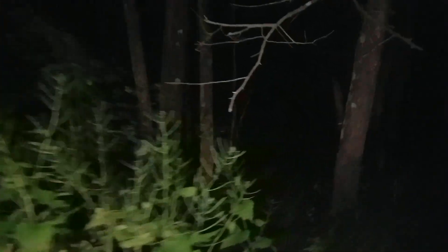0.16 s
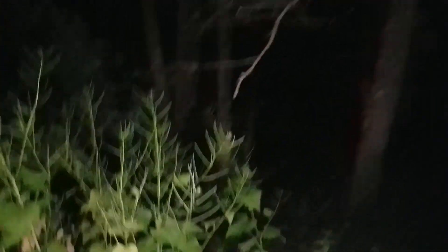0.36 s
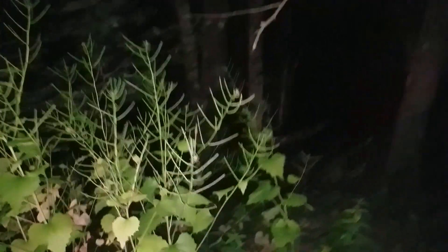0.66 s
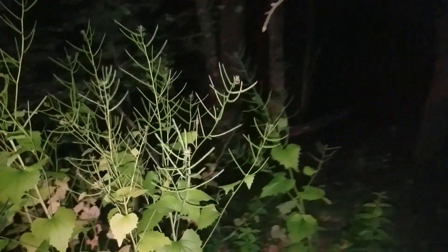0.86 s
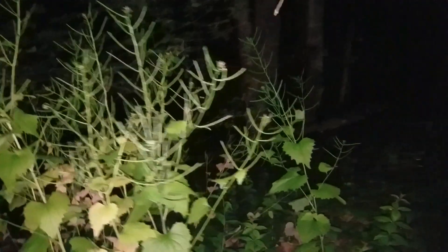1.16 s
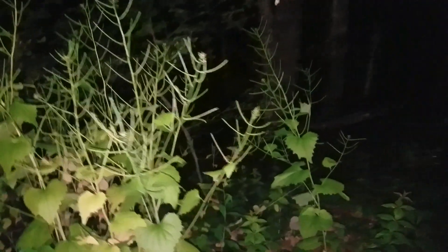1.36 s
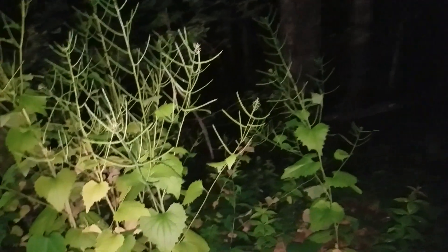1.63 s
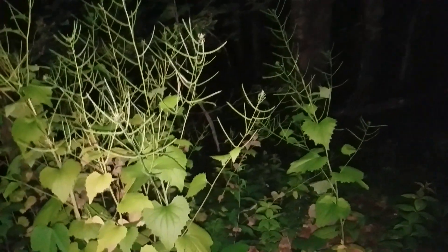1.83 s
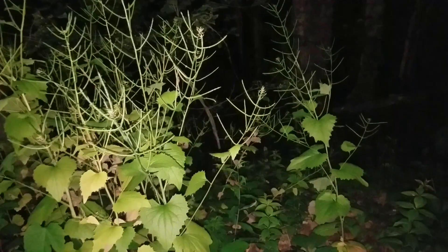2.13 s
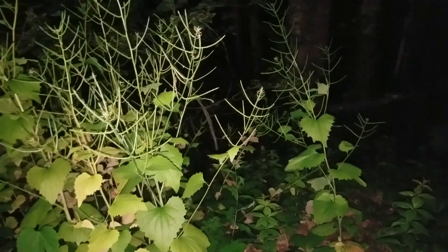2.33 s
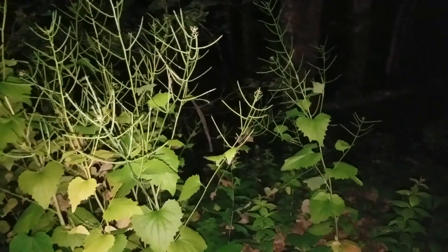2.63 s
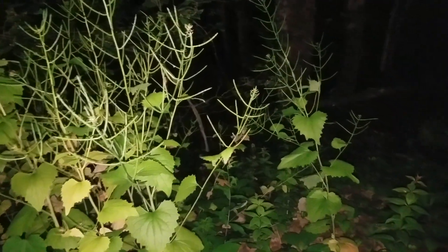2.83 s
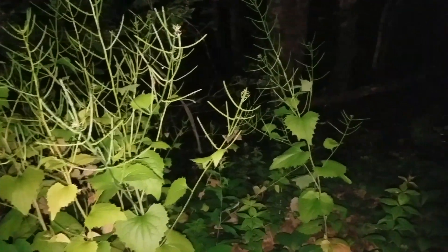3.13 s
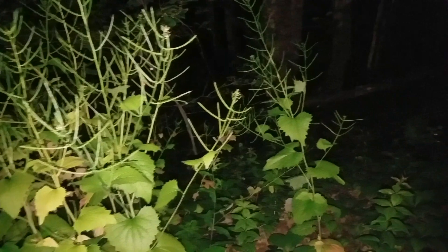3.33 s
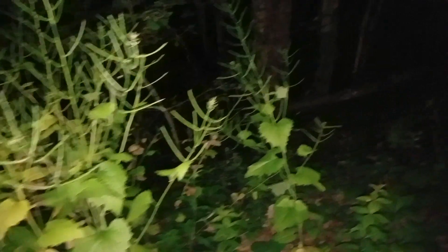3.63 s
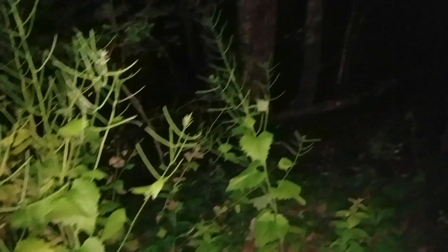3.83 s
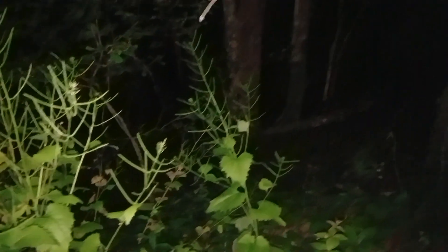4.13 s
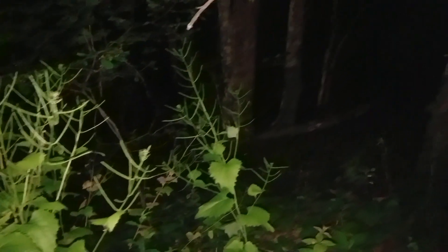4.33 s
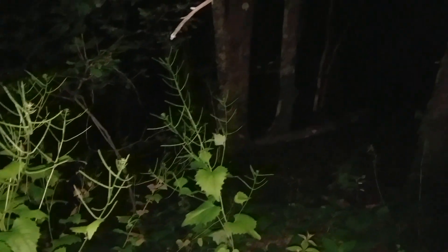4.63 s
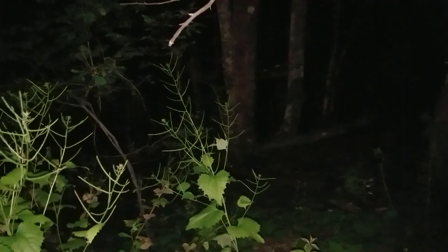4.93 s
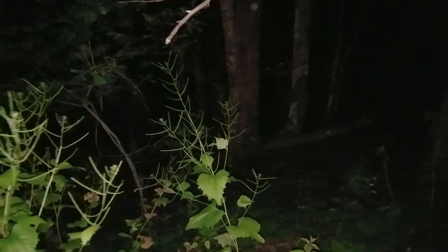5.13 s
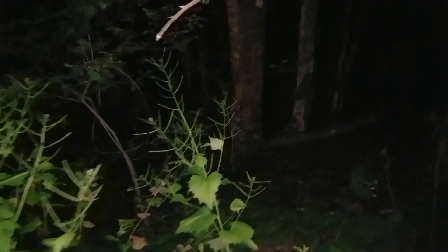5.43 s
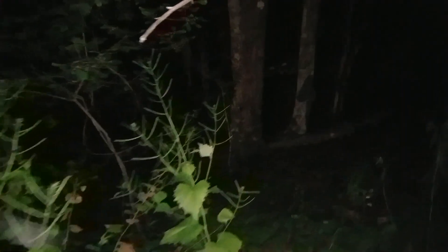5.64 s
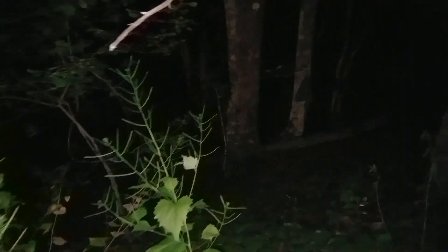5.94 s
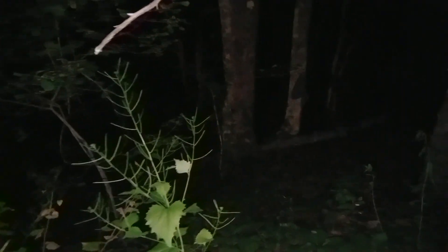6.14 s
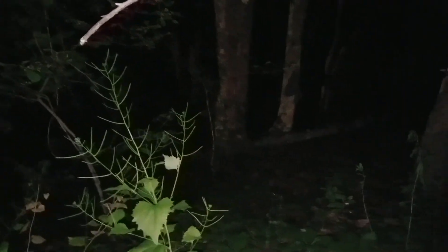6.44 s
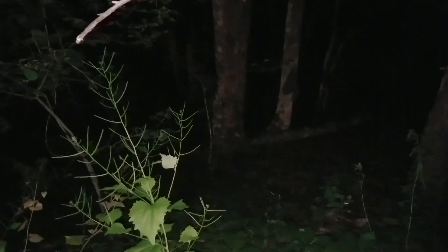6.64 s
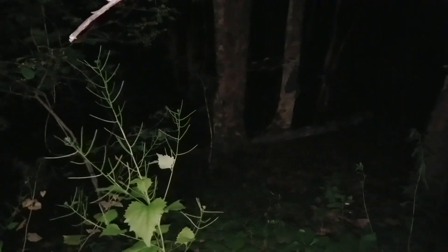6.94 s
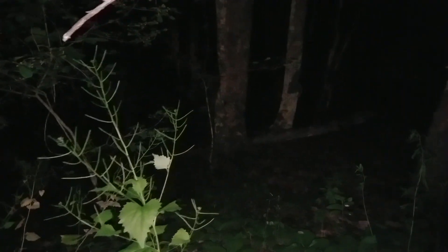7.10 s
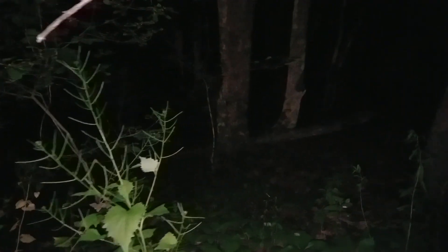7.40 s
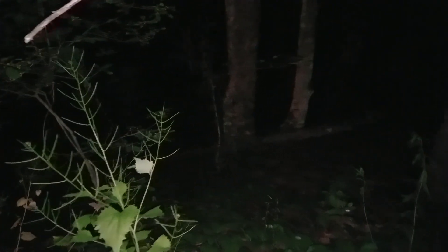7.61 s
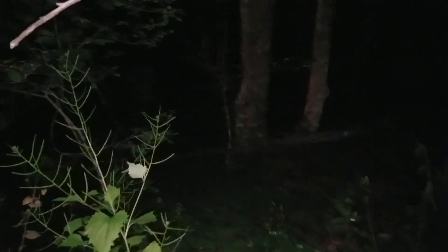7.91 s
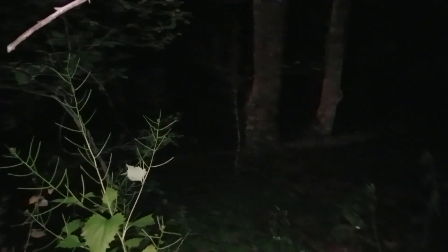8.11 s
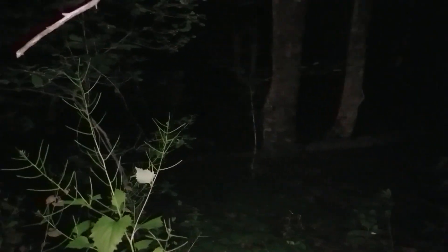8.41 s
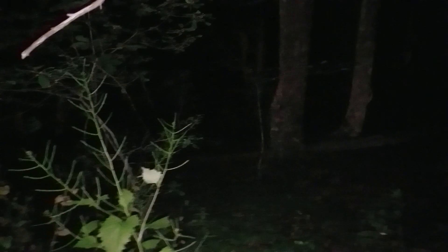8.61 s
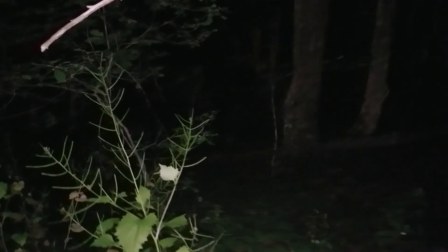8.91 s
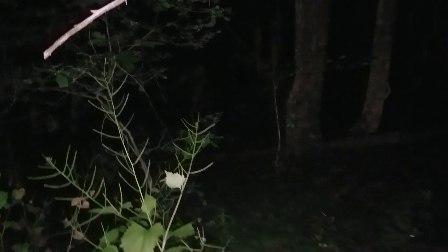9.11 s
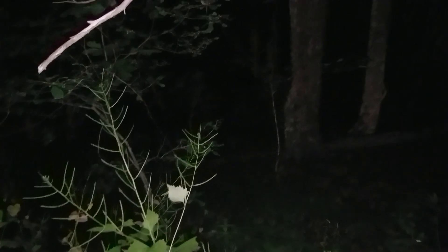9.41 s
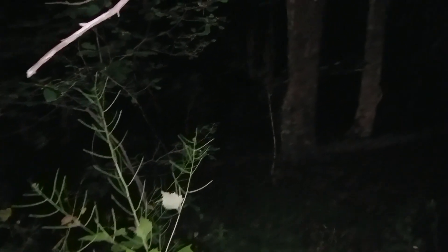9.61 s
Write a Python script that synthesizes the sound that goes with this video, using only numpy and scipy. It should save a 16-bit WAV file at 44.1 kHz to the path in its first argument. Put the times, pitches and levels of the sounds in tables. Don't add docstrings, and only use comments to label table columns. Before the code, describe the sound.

A handheld phone hears frogs from near and far, strongest on the right, their rapid purring trills softened by echo among trees. First come light stem ticks and leafy rustles, later a dull thump on the left and a hard dry snap. Behind, a distant vehicle fades, then swells with rumble, tyre roar and a sinking hollow murmur, alongside soft hum, hiss and a barely audible insect.

```python
import sys
import numpy as np
from scipy import signal
from scipy.fft import rfft, irfft
from scipy.io import wavfile
from scipy.ndimage import uniform_filter1d

SR = 44100
rng = np.random.default_rng(int(sys.argv[2]) if len(sys.argv) > 2 else 0)


def wav_record(signal):
    frames = np.transpose(np.atleast_2d(signal))
    bounded = np.clip(frames, -1, 1)
    quanta = np.round(bounded * 32767).astype(np.int16)
    wavfile.write(sys.argv[1], SR, quanta)


def volts_from_decibels(level):
    exponent = np.asarray(level, float) / 20
    return 10 ** exponent


N = 430416

# first_pulse_s, last_pulse_s, pulse_count, second_partial_hz, level_db
RIGHT_BIG = [
    (1.442, 1.821, 10, 1919, -13),
    (8.825, 9.247, 11, 1880, -15.5),
]
RIGHT_SMALL = [
    (0.023, 0.463, 10, 2143, -24.5),
    (0.499, 1.012, 13, 2372, -26.5),
    (0.819, 1.304, 12, 1887, -19.5),
    (3.546, 3.898, 8, 2154, -25.5),
    (9.269, 9.752, 12, 2108, -27.5),
]
AHEAD_BIG = [
    (4.907, 5.229, 9, 1940, -16),
    (6.129, 6.518, 10, 2008, -16.5),
]
STUMP_BIG = [
    (3.007, 3.608, 15, 1889, -21),
    (4.02, 4.544, 14, 1896, -15.5),
    (7.7, 8.195, 13, 1874, -16),
    (7.79, 8.28, 13, 1870, -29),
]
AHEAD_SMALL = [
    (2.83, 3.514, 17, 2101, -15.5),
    (5.323, 5.782, 11, 2073, -23),
    (6.237, 6.722, 12, 2176, -21.5),
    (7.682, 8.232, 13, 2118, -15.5),
]
POND_NEAR = [
    (1.633, 2.219, 14, 2151, -20),
    (5.073, 5.826, 17, 2214, -20.5),
    (5.19, 5.818, 14, 2117, -16.5),
    (6.726, 7.348, 14, 2142, -26.5),
    (8.951, 9.746, 19, 2139, -20),
]
POND_FAR = [
    (0.404, 0.83, 11, 2028, -21),
    (0.65, 1.122, 12, 1940, -24),
    (1.456, 2.27, 19, 2199, -22.5),
    (1.734, 2.274, 13, 2033, -22.5),
    (2.806, 3.545, 18, 2360, -20.5),
    (3.991, 4.563, 15, 1824, -33),
    (8.202, 8.499, 7, 2137, -27),
]
REEDS = [
    (0.009, 0.445, 11, 2186, -21.5),
    (2.835, 3.577, 17, 2263, -24),
    (6.194, 6.859, 15, 2302, -22),
    (6.822, 7.333, 13, 2079, -19.5),
]
# left_minus_right_db, fundamental_db, third_partial_db, reverb_share_db, build_up_s
FROG_VOICES = [
    (-28.5, -19, -24, -9, 0.12),
    (-32, -12, -24, -7, 0.037),
    (-13.5, -15, -27, -12.5, 0.055),
    (-10, -20, -19.5, -8.5, 0.085),
    (-11.5, -14.5, -26.5, -6, 0.18),
    (-12.5, -10, -26, -10.5, .1),
    (-8.5, -12, -25, -9.5, 0.23),
    (-13.5, -13, -19.5, -9, 0.083),
]
# upward_glide_percent_per_ms, sac_sharpness
PULSE_SHAPES = [(1.2, 4.9), (1.3, 2.2), (1.45, 2.4), (.85, 6), (1.15, 2.1), (1.2, 1.84), (1.3, 2.5),
                (1.1, 1.9)]
UPPER_PARTIALS_DB = [-28, -35.5, -40, -43, -42]
RISE_MS, FALL_MS = 14.0, 7.0
LEVEL_OFF_MS = 15.95
PULSE_SCATTER_DB, UPPER_ROUGHNESS, FIRST_PULSE_DB = 2, 0.55, -11
PORT_HZ, PORT_WIDTH_HZ = 7290, 640
LEFT_LAG_S = 0.00023
WOOD_T60_S, WOOD_TREBLE_T60_S = 0.9, 1

# start_s, body_peak_db, treble_above_body_db
STEM_TICKS = [(0.1477, -42, -12), (0.2124, -51.5, -7), (0.276, -48, -25), (0.2942, -40, -20.5),
              (0.4438, -50, -20), (0.5246, -33.5, -19), (0.5846, -33.5, -12), (0.6672, -40.5, -17.5),
              (0.7355, -44.5, -20), (1.1075, -55, -8), (1.1328, -35, -18), (1.1533, -59, -11.5),
              (1.1862, -51, -18), (1.202, -37, -24), (1.216, -45, -17), (1.3212, -36, -30),
              (1.3796, -44, -15.5), (1.5663, -76, -13), (1.923, -38, -13), (2.195, -38, -21),
              (2.2228, -41, -26), (5.6276, -45, -27), (5.689, -41, -24), (5.8092, -44, -11),
              (5.834, -38.5, -26), (7.747, -41, -27), (7.864, -41, -31), (8.2342, -50, -11),
              (8.2616, -51, -6), (9.2484, -44, -5)]
# centre_s, peak_db, pitch_hz, ring_ms, left_minus_right_db
TWIG_SNAPS = [(5.5803, -3, 1450, .45, -12), (1.2165, -20, 1400, .8, -8), (.409, -23, 1400, 1., -8),
              (.446, -23, 1450, 1., -8), (5.812, -24, 1200, .7, -8), (8.236, -20, 1500, .6, -8),
              (.5832, -22, 15000, .5, -14), (.5855, -26, 15400, 1.4, -14), (5.5801, -17, 2800, .4, -12),
              (5.58, -30, 5000, .4, -10), (.33, -25, 1350, 1., -8), (.237, -26, 1200, .8, -8),
              (.312, -27, 900, 1., -6), (.222, -28, 900, 1., -6), (.19, -28, 1100, .6, -8),
              (.16, -29, 1600, .6, -8), (1.2017, -25, 1200, .6, -8), (1.154, -29, 2700, .5, -8),
              (1.1326, -30, 2700, .5, -8), (1.0, -33, 480, 4., -5), (8.2355, -23, 2800, .3, -8),
              (7.682, -33, 2900, .5, -8), (9.2507, -28, 3200, .25, -6), (9.2868, -32, 3000, .3, -6)]
# start_s, peak_db
FINGER_TAPS = [
    (4.1524, -19),
    (4.1539, -8.5),
]
TICK_PAN_DB, STRAY_TICKS_PER_S, STRAY_TICK_DB = -15, 2.1, -55.5
# start_s, length_s, level_db
BRUSHES = [(0, .06, -71), (0.166, 0.12, -69), (0.285, 0.21, -71.5), (0.978, 0.065, -71), (1.067, 0.16, -71),
           (1.29, 0.14, -75), (1.531, 0.11, -57), (1.674, 0.084, -62), (1.787, 0.02, -64),
           (8.249, 0.05, -69), (8.342, 0.028, -70), (8.405, 0.1, -72.5), (9.62, 0.12, -81.5)]
BRUSH_ATTACK_S, BRUSH_RELEASE_S = 0.016, 0.019
# freq_hz, level_db_per_hz
LEAF_COLOUR = [(400, -14), (1000, 12), (1500, 16.5), (4000, 2), (7500, 2.5), (9500, -20.5), (12000, -7),
               (15500, 1.5)]
# freq_hz, level_db_per_hz
TWIG_COLOUR = [(250, -16), (500, -7), (1200, -7), (2500, 5), (5500, -20)]
CRACKLE_PER_S, CRACKLE_DB = 110, -50.5

# time_s, level_db
APPROACH = [
    (0, 1),
    (1.6, -2.5),
    (2.7, -4),
    (4.9, -1),
    (6, 1.5),
    (7.5, 4.5),
    (8.8, 6),
    (9.76, 8.5),
]
# freq_hz, level_db_per_hz
RUMBLE_COLOUR = [(18, -21), (30, -14.5), (45, -9.5), (64, 0), (90, -2), (130, -6.5), (200, -32.5)]
# freq_hz, level_db_per_hz
DRONE_COLOUR = [(120, -37), (200, -5), (330, -0.5), (480, 2), (620, 3.5), (900, -1), (1200, -35)]
# freq_hz, level_db_per_hz
ROAR_COLOUR = [(500, -27), (800, -4.5), (1100, 0.5), (1500, -2), (2200, -4), (3000, -19), (4500, -36.5)]
# level_at_middle_distance_db, gain_per_approach_db
RUMBLE_LEVEL = (-56.5, 0.95)
DRONE_LEVEL = (-56, 1.3)
TYRES_LEVEL = (-48, 1.05)
# time_s, pitch_hz, level_db
MURMUR = [
    (0, 616.4, -79.5),
    (5.6, 620, -75),
    (6.3, 593, -55),
    (7.6, 552.5, -69),
    (8.6, 485, -59),
    (9.76, 461.3, -50),
]
MURMUR_WIDTH_HZ = 60
CRICKET_HZ, CRICKET_WIDTH_HZ, CRICKET_PER_S, CRICKET_DB = 10900, 220, 2.9, -85.5
# freq_hz, level_db_per_hz
HUM_COLOUR = [(90, -6), (130, -5.5), (190, 0), (230, -5.5), (300, -15.5)]
HUM_DB, HUM_FADE_DB_PER_S = -55.5, -0.32
# freq_hz, level_db_per_hz
HISS_COLOUR = [(1650, -34), (2800, -0.5), (4200, -4), (6620, -6.5), (8670, -14), (10900, -9.5), (15000, -7),
               (16000, -5.5)]
HISS_DB = -69
# freq_hz, left_minus_right_db
PORT_TILT = [(200, -3.5), (500, -6), (1000, -5.5), (4000, -11), (8000, -3), (12000, 0.5)]
# freq_hz, correlation_0_to_1
LIKENESS = [(60, 0.98), (130, 0.9), (290, 0.7), (640, 0.5), (1400, 0)]
TOP_HZ = 15700


def add(track, sound, s):
    i = int(s * SR)
    cut = max(-i, 0)
    n = min(sound.shape[-1] - cut, N - i - cut)
    track[..., i + cut:i + cut + n] += sound[..., cut:cut + n]


def table(points, hz):
    f, v = np.transpose(points)
    return np.interp(np.log(hz + 1), np.log(f), v)


def noise(spectrum):
    hz = np.arange(N // 2 + 1) * SR / N
    a, b = rfft(rng.standard_normal((2, N)))
    alike = np.clip(table(LIKENESS, hz), 0, 1)
    mid = np.sqrt(1 + alike) * a
    side = np.sqrt(1 - alike) * b
    tilt = volts_from_decibels(table(PORT_TILT, hz) / 2)
    inside = (hz > spectrum[0][0]) & (hz < spectrum[-1][0])
    ports = np.array([(mid + side) * tilt, (mid - side) / tilt])
    x = irfft(inside * volts_from_decibels(table(spectrum, hz)) * ports, N)
    return x / np.std(x.mean(axis=0))


def walk(rate):
    k = int(SR / rate)
    held = np.repeat(rng.standard_normal(N // k + 1), k)
    w = uniform_filter1d(uniform_filter1d(held, k), k)[:N]
    return w / np.std(w)


def swell(ms):
    return np.cos(np.pi / 2 * np.clip(ms / np.where(ms < 0, RISE_MS, FALL_MS), -1, 1))


def pulse(hz, partials_db, glide, sharp):
    ms = np.arange(1500) / SR * 1000 - 20
    pitch = 1 + glide / 100 * LEVEL_OFF_MS * (1 - np.exp(-ms / LEVEL_OFF_MS))
    phase = np.pi * hz * np.cumsum(pitch) / SR
    shapes = [swell(0.62 * ms - 3.5) ** 1.69,
              swell(ms) ** (0.91 * sharp),
              swell(ms - 1.2) ** (1.3 * sharp)]
    rough = 7.1 * uniform_filter1d(rng.standard_normal(len(ms)), size=70)
    rasp = 1 - UPPER_ROUGHNESS + UPPER_ROUGHNESS * rough
    for k in range(4, len(partials_db) + 1):
        sweep_hz = k * hz / 2 * pitch
        port_lift = np.exp(-((sweep_hz - PORT_HZ) / PORT_WIDTH_HZ) ** 2)
        shapes.append(rasp * swell(ms) ** 2.0 * (0.34 + port_lift))
    return sum(volts_from_decibels(db) * shapes[k] * np.sin((k + 1) * phase + k) for k, db in enumerate(partials_db))


def trunks(echo_db, spread_ms):
    path = np.zeros((2, 2048))
    path[0, int(round(LEFT_LAG_S * SR))] = 1
    path[1, 0] = 1
    when, size = rng.random((2, 2, 6))
    for side in range(2):
        at = np.clip(40 + when[side] * spread_ms * SR / 1000, 0, 2047).astype(int)
        np.add.at(path[side], at, volts_from_decibels(echo_db) * (2 * size[side] - 1))
    return path


def wood(x):
    t = np.arange(int(1.6 * SR)) / SR
    low, high = rng.standard_normal((2, 2, len(t)))
    low = signal.lfilter(*signal.butter(2, 2600, fs=SR), low) * volts_from_decibels(-60 * t / WOOD_T60_S)
    high = signal.lfilter(*signal.butter(2, 2600, "high", fs=SR), high) * volts_from_decibels(-60 * t / WOOD_TREBLE_T60_S)
    tail = signal.lfilter(*signal.butter(1, 1500, "high", fs=SR), low + high)
    tail *= 1 - np.exp(-t / 0.025)
    tail /= np.sqrt(np.sum(low[1] ** 2))
    return signal.fftconvolve(x[None], tail, axes=1)[:, :N] * volts_from_decibels([[-8.0], [0]])


def frogs():
    near, far = np.zeros((2, N)), np.zeros(N)
    perches = (RIGHT_BIG, RIGHT_SMALL, AHEAD_BIG, STUMP_BIG, AHEAD_SMALL, POND_NEAR, POND_FAR, REEDS)
    for trills, voice, shape in zip(perches, FROG_VOICES, PULSE_SHAPES):
        pan_db, low_db, third_db, wet_db, swell_s = voice
        partials_db = [low_db, 0, third_db, *UPPER_PARTIALS_DB]
        for first, last, count, hz, db in trills:
            chance = rng.standard_normal((30, 3))
            train = np.zeros((1, SR))
            path = trunks(echo_db=-13, spread_ms=30) * volts_from_decibels([[pan_db], [0]])
            for k, s in enumerate(np.linspace(first, last, int(round(count)))):
                still_weak = max(1 - (s - first) / max(swell_s, 0.01), 0) ** 1.5
                swell_db = FIRST_PULSE_DB * still_weak * (first > 0.05)
                chirp = pulse(hz * (1 + 0.0079 * chance[k, 0]), partials_db, *shape)
                level_db = db + swell_db + PULSE_SCATTER_DB * chance[k, 1]
                at = s - first + 0.05 - 0.0178 + 0.0004 * chance[k, 2]
                add(train, chirp[None] * volts_from_decibels(level_db), at)
            add(near, signal.fftconvolve(train, path, axes=1), first - 0.05)
            add(far, train[0] * volts_from_decibels(wet_db), first - 0.05)
    return near + wood(far)


def distant_chorus(db, per_second):
    x = np.zeros(N)
    for s, pitch in rng.random((int(per_second * N / SR), 2)):
        add(x, pulse(1850 + 420 * pitch, [-8, 0, -26], glide=0.52, sharp=0.99), s * N / SR)
    return wood(x * volts_from_decibels(db))


def stem_ticks():
    out, t = np.zeros((2, N)), np.arange(1300) / SR
    when, size = rng.random((40, 2))[:int(STRAY_TICKS_PER_S * N / SR)].T
    strays = np.transpose([when * N / SR, STRAY_TICK_DB + 5.4 * size, -6.5 + 0 * size])
    pan_db = np.array([[TICK_PAN_DB], [-TICK_PAN_DB]]) / 2
    for s, db, treble_db in [*STEM_TICKS, *strays]:
        crack = rng.standard_normal((2, 2, len(t))) * (np.exp(-t / 0.00013) + 0.1 * np.exp(-t / 0.003))
        high = signal.lfilter(*signal.butter(2, [11500, 15800], "band", fs=SR), crack[0])
        body = signal.lfilter(*signal.butter(3, [700, 4600], "band", fs=SR), crack[1])
        treble = volts_from_decibels(treble_db + np.array([[4.5], [9.5]])) * high
        add(out, (treble + volts_from_decibels(13.5) * body) * volts_from_decibels(db + pan_db), s)
    return out


def twig_snaps():
    out, t = np.zeros((2, N)), np.arange(1300) / SR
    for s, db, hz, ring_ms, pan_db in TWIG_SNAPS:
        peak_s = ring_ms / 500
        ring = np.sin(2 * np.pi * hz * (t - peak_s)) * np.exp(-(1000 * t / ring_ms - 2) ** 2)
        add(out, ring * volts_from_decibels([[db + pan_db], [db]]), s - peak_s)
    return out


def finger_taps():
    out, t = np.zeros((2, N)), np.arange(1300) / SR
    push = np.exp(-t / 0.0023) - 0.94 * t / 0.0022 * np.exp(-(t / 0.0026) ** 1.17)
    push *= 1 - np.exp(-(t / 0.0002) ** 2)
    for s, db in FINGER_TAPS:
        add(out, push * volts_from_decibels([[db], [db - 29]]), s)
    return out


def leaves():
    t, stroke = np.arange(N) / SR, np.zeros(N)
    for s, length, db in BRUSHES:
        attack = np.clip((t - s) / BRUSH_ATTACK_S + 1, 0, 1)
        release = np.exp(-np.maximum(t - s - length, 0) / BRUSH_RELEASE_S)
        stroke += volts_from_decibels(db + 16.0) * attack * release
    grains = (rng.random(N) < 400 / SR) * volts_from_decibels(3.55 * rng.exponential(size=N))
    grains = 1.3 + signal.lfilter([1], [1, -np.exp(-1 / (0.00069 * SR))], grains)
    grains /= np.sqrt(np.mean(grains ** 2))
    snaps = (rng.random(N) < CRACKLE_PER_S / SR) * volts_from_decibels(np.minimum(3.0 * rng.exponential(size=N), 9.5))
    snaps = signal.lfilter([1], [1, -np.exp(-1 / (0.0013 * SR))], snaps)
    crackle = noise(TWIG_COLOUR) * snaps * volts_from_decibels(CRACKLE_DB) * np.minimum(stroke / volts_from_decibels(-54.5), 1)
    return crackle + noise(LEAF_COLOUR) * grains * stroke * volts_from_decibels(0.91 * walk(30))


def vehicle():
    nearer_db = np.interp(np.arange(N) / SR, *np.transpose(APPROACH))
    out = np.zeros((2, N))
    layers = ((RUMBLE_COLOUR, RUMBLE_LEVEL, 1.7), (DRONE_COLOUR, DRONE_LEVEL, 1.7), (ROAR_COLOUR, TYRES_LEVEL, 0.7))
    for colour, (db, slope), flicker_db in layers:
        out += noise(colour) * volts_from_decibels(db + slope * nearer_db + flicker_db * walk(6))
    return out


def murmur():
    t, (s, hz, db) = np.arange(N) / SR, np.transpose(MURMUR)
    phase = 2 * np.pi * np.cumsum(np.interp(t, s, hz)) / SR
    band = walk(MURMUR_WIDTH_HZ) * np.cos(phase) + walk(MURMUR_WIDTH_HZ) * np.sin(phase)
    return volts_from_decibels(np.interp(t, s, db)) * band * volts_from_decibels([[-3], [3]])


def cricket():
    t = np.arange(N) / SR
    bursts = np.clip(np.sin(2 * np.pi * CRICKET_PER_S * t + 1.5 * walk(0.8)), 0, 1)
    bursts *= volts_from_decibels(CRICKET_DB + 3.5 * walk(1.5))
    return bursts * walk(CRICKET_WIDTH_HZ) * np.sin(2 * np.pi * CRICKET_HZ * t) * volts_from_decibels([[-3], [3]])


def hum():
    t = np.arange(N) / SR
    return noise(HUM_COLOUR) * volts_from_decibels(HUM_DB + HUM_FADE_DB_PER_S * t + 0.95 * walk(8))


def hiss():
    return volts_from_decibels(HISS_DB) * noise(HISS_COLOUR)


def scene():
    calls = frogs() + distant_chorus(db=-53, per_second=56)
    touches = stem_ticks() + twig_snaps() + finger_taps() + leaves()
    return calls + touches + vehicle() + murmur() + cricket() + hum() + hiss()


def band_limit(x):
    return signal.sosfilt(signal.butter(12, 16850, fs=SR, output="sos"), x)


def record(dry):
    low_pass = signal.ellip(10, 0.2, 60, TOP_HZ, fs=SR, output="sos")
    mix = signal.sosfilt(low_pass, dry)
    return band_limit(mix)


dry = scene()
out = record(dry)
wav_record(out)
```